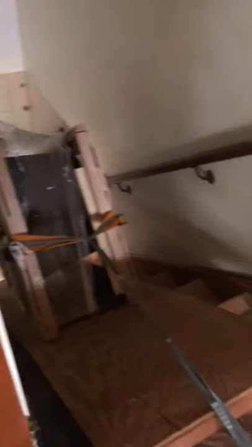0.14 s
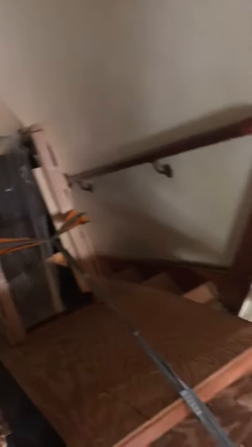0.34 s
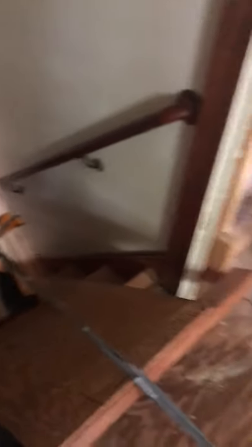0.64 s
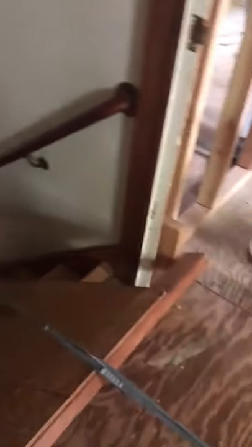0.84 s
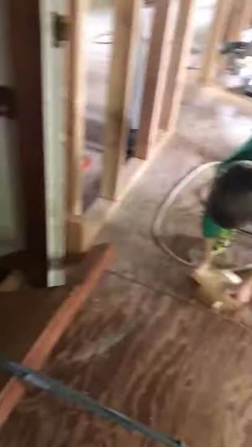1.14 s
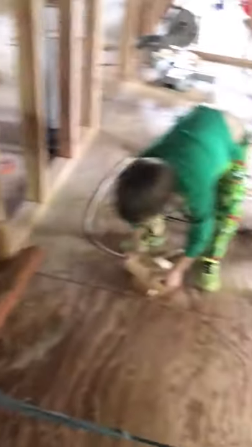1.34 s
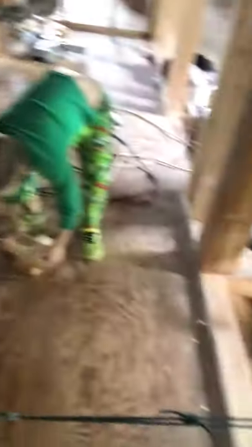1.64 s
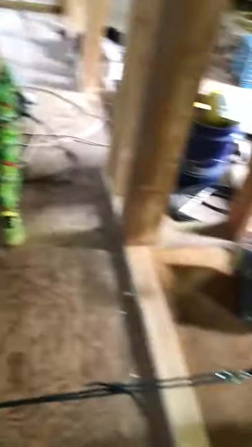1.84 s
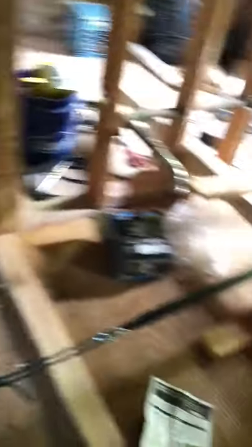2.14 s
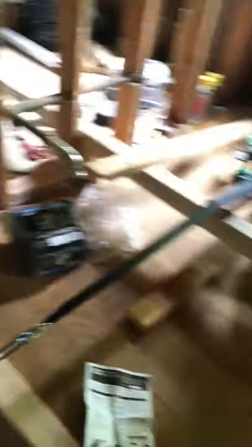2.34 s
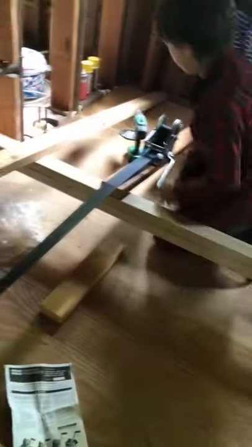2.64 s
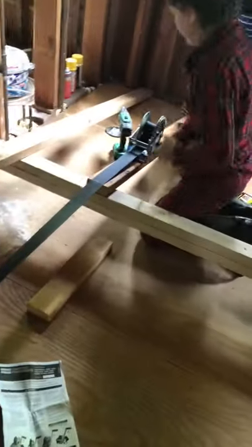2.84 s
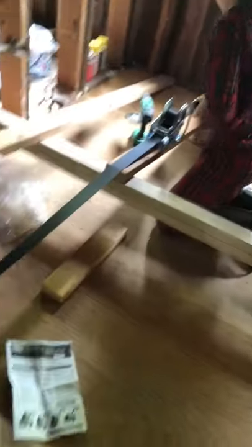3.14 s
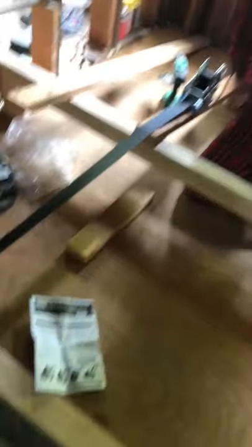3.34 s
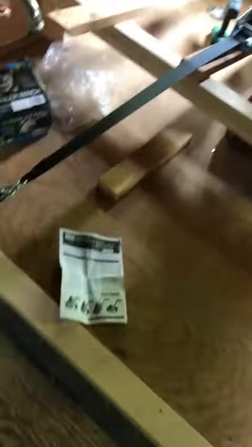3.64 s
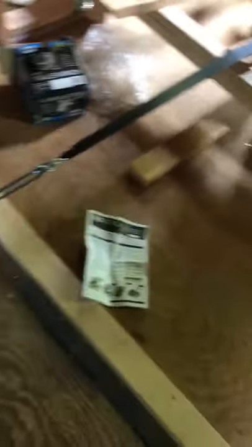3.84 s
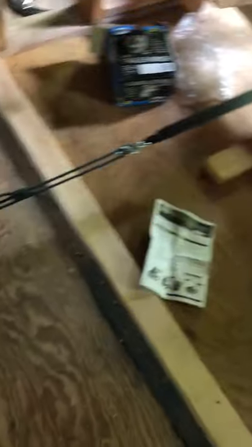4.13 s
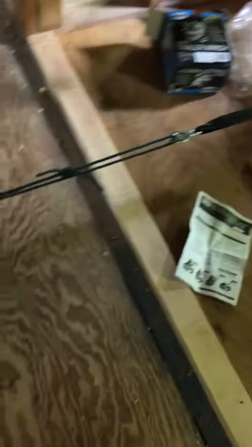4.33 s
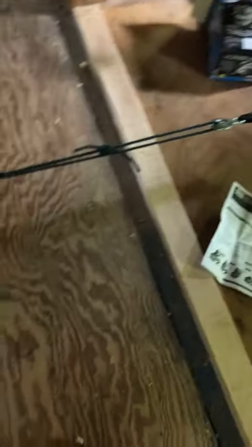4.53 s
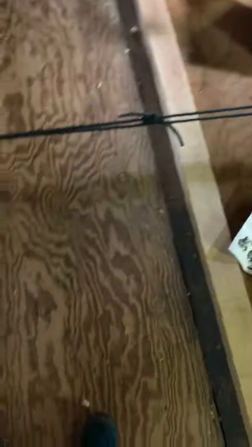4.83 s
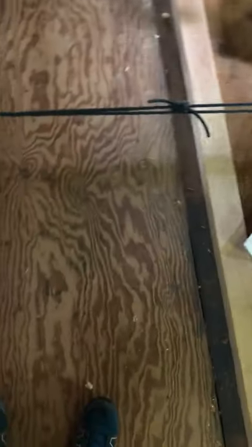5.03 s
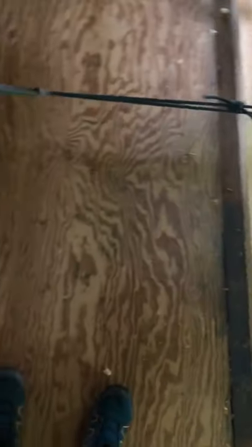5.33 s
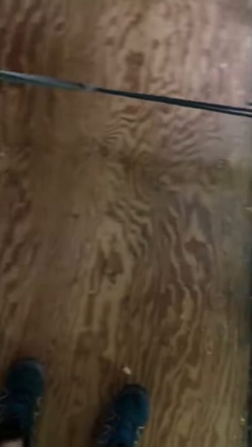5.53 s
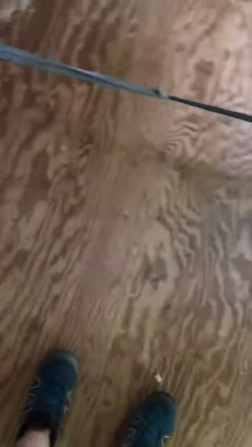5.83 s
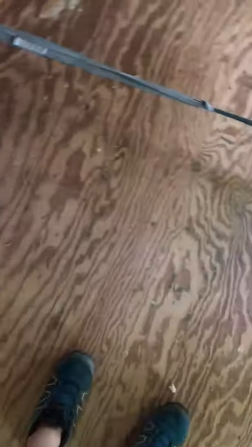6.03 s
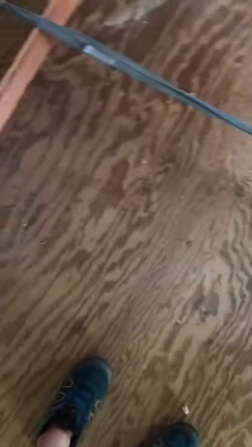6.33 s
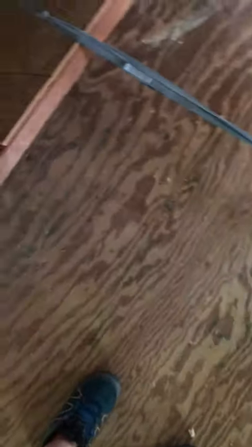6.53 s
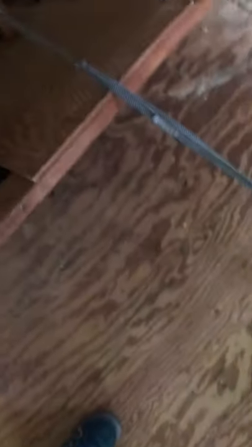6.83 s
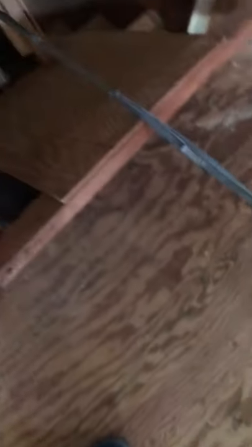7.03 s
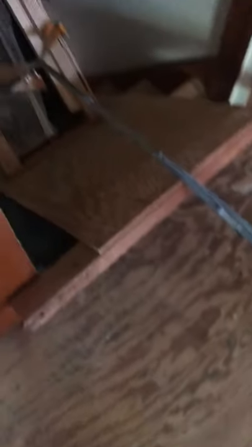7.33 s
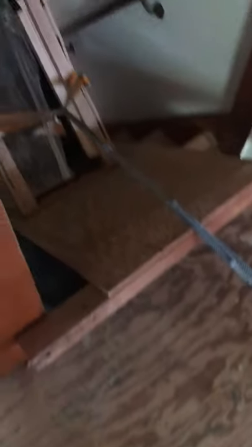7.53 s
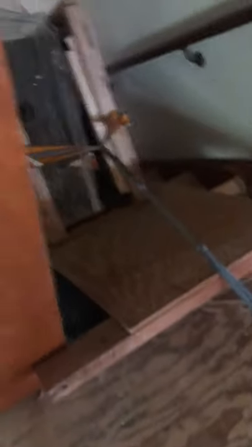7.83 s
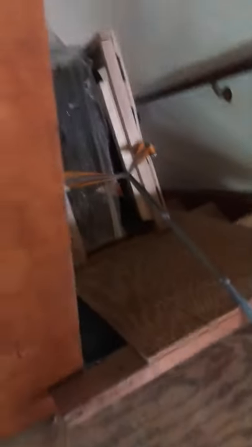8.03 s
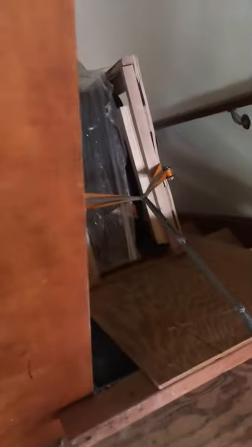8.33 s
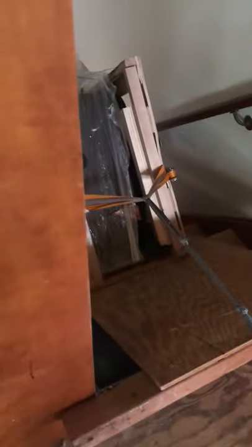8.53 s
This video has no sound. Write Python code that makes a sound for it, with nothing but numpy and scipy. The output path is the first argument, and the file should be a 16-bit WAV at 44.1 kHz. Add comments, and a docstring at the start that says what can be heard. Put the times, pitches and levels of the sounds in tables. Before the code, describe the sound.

Sharp metallic ratchet clicks, irregular and echoing, with strap snaps, a faint strap hiss and a cluster of dull booming wooden knocks near the end.

```python
"""Hand winch on a staircase

A hand winch hauls a heavy crate up a staircase in a bare timber room. Its steel pawl cracks from tooth
to tooth: coloured noise bursts, with damped modes for the ringing wheel and frame. The loaded strap and
frame snap now and then and thump a board; the crate knocks on wooden steps that boom as modes.
Shaped noise makes the still air, the rumbling floor and the faint hiss and squeal of the sliding strap."""
import sys
import numpy as np
from scipy import signal
from scipy.fft import rfft, irfft, next_fast_len
from scipy.io import wavfile

SR = 44100
rng = np.random.default_rng(int(sys.argv[2]) if len(sys.argv) > 2 else 0)


def generate_wav(sig):
    """Save sig (samples, or channels by samples) to the path in sys.argv[1] as 16-bit PCM at SR."""
    pcm = np.round(np.clip(np.atleast_2d(sig).T, -1, 1) * 32767).astype(np.int16)
    wavfile.write(sys.argv[1], SR, pcm)


N = 383229
SINCE_BLOW = np.arange(SR) / SR  # one second of time, in s

# the pawl drops off a tooth: t/s, level/dB of the crack before its trim
PAWL_DROPS = [(-0.085, 1), (0.063, -14), (0.27, -13), (0.409, -13.5), (0.527, -12.5), (0.62, -12),
              (0.731, -13.5), (0.887, -12), (1.014, -9), (1.121, -9), (1.217, -13.5), (1.34, -9),
              (1.568, -9.5), (1.85, -13), (2.264, -8.5), (2.525, -10), (2.68, -10), (2.808, -10.5),
              (2.954, -10), (3.279, -11), (3.546, -10), (3.788, -8.5), (3.941, -6.5), (4.104, -7.5),
              (4.369, -10.5), (5.708, -11), (6.028, -11), (6.326, -10), (6.528, -11.5), (7.413, -11),
              (7.525, -11.5), (7.691, -11), (8.064, -9)]
# the loaded strap and frame snap, and at 1.242 and 1.261 s the pawl bounces with a like short crack and almost
# no thump: t/s, level/dB, level/dB of the board's thump against the snap, before its trims
STRAP_SNAPS = [(0.049, -21.5, 5.5), (0.232, -30.5, -1), (0.417, -20, 3.5), (0.584, -21.5, 3),
               (1.242, -17, -34), (1.261, -20.5, -26), (1.629, -17, -1.5), (3.648, -19.5, 4.5),
               (4.593, -52, -2), (5.288, -46, 10.5), (6.581, -20.5, 2.5), (7.098, -32, 7),
               (7.447, -23.5, 3.5), (8.496, -22, 3), (8.662, -54.5, 26)]
# the crate knocks on the stairs: t/s, level/dB
CRATE_KNOCKS = [(1.051, -28.5), (6.266, -15.5), (6.634, -32.5), (6.763, -13.5), (6.799, -15),
                (6.828, -14.5), (6.840, -14), (7.038, -17), (7.100, -22.5), (7.159, -27.5), (7.346, -37.5),
                (7.632, -37.5), (8.004, -38.5)]
# soft thuds in the floor: t/s, level/dB, f/Hz
FLOOR_THUDS = [(1.06, -37.5, 79.5), (1.151, -45, 75), (5.299, -42.5, 165), (5.34, -50, 65),
               (5.51, -43, 51.7), (5.549, -55, 178)]
# the strap slips along the floor: t/s of the start, length/s, level/dB before its fade
STRAP_SLIPS = [(1.993, 0.23, -56), (5.203, 0.2, -57.5), (5.423, 0.44, -57), (6.225, 0.14, -46.5),
               (6.92, 0.17, -55), (7.312, 0.3, -52.5), (7.91, 0.11, -68), (8.252, 0.3, -50.5)]
# treble of the winch as the microphone turns to it and away: t/s, tilt/dB per octave
MICROPHONE_FACING = [(0, -0.8), (1.0, -0.67), (2.3, 0), (3.0, -0.5), (3.8, 0.44), (4.4, -1.95), (6.0, 0),
                     (7.5, 0.1), (8.1, 0.5)]

# resonant modes of the ratchet wheel and pawl: f/Hz, level/dB, t60/s
WHEEL_MODES = [(1297, -2, 0.037), (1478, -13, 0.056), (2260, -7, 0.037), (3590, -1.5, 0.0067),
               (3797, 0.5, 0.011), (4227, -0.5, 0.0042), (4300, 9.5, 0.0087), (7854, -2, 0.042),
               (7760, -15.5, 0.0072)]
# resonant modes of the drum and frame of the winch: f/Hz, level/dB, t60/s
FRAME_MODES = [(1033, -7.5, 0.032), (1677, -7.5, 0.02), (1915, -3, 0.022), (2800, -5, 0.032),
               (5403, 0, 0.016), (5640, 0, 0.0092), (7370, 1.5, 0.0049), (11160, 6.5, 0.005)]
# resonant modes of the board under the winch: f/Hz, level/dB, t60/s
BOARD_MODES = [(279, -4.5, 0.076), (519, -3, 0.046), (625, -2, 0.039), (723, 4.5, 0.014),
               (1160, 8.5, 0.012), (1320, 14.5, 0.0058), (2230, 7.5, 0.0069)]
# resonant modes of the wooden stairs: f/Hz, level/dB, t60/s
STAIR_MODES = [(100.6, -6, 0.45), (204.7, 5.5, 0.48), (321, 9.5, 0.14), (422, -2, .2), (488, -8.5, .25),
               (695, -14, 0.18), (760, -9.5, 0.1)]
# resonances of the winch under the slipping strap: f/Hz, width/Hz, level/dB
SQUEAL_BANDS = [(2494, 64, 4), (4160, 150, -5.5), (4565, 66, -1), (6040, 130, -8.5)]

# Colours are relative spectra; each sound is scaled to its own level afterwards.
# colour of the pawl's crack: f/Hz, level/dB per Hz
PAWL_CRACK_COLOUR = [(100, -36), (500, -49), (1100, 2), (2200, 4), (3200, 1.5), (4200, 7), (6600, 4.5),
                     (7900, 8), (9500, 4), (11200, 3.5), (15500, -1.5)]
# colour of the winch's clatter and its wash in the room: f/Hz, level/dB per Hz
PAWL_WASH_COLOUR = [(60, -24.5), (150, -13.5), (300, -9.5), (700, -11.5), (1200, -4.5), (2300, -4),
                    (3250, -8.5), (4200, -1), (4900, -8.5), (7900, -5), (9500, -9), (15500, -14)]
# colour of snaps, creaks and contact ticks: f/Hz, level/dB per Hz
SNAP_COLOUR = [(200, -23), (1200, 4.5), (3000, 5), (6000, 4), (11000, 1), (15500, -2)]
# colour of the crate's blow: f/Hz, level/dB per Hz
CRATE_COLOUR = [(50, -35.5), (130, -12.5), (200, 4.5), (330, 4), (500, -3), (780, 0.5), (1000, -9.5),
                (1600, -20.5), (3000, -32.5), (7000, -54.5), (15000, -62)]
# colour of the walls' echoes: f/Hz, level/dB per Hz
ECHO_COLOUR = [(100, -0.5), (16000, -2)]
# colour of the still room air: f/Hz, level/dB per Hz
AIR_COLOUR = [(15, -60.5), (25, -27), (44, -3.5), (145, 5.5), (503, -11.5), (1560, -13), (4140, -22),
              (4490, -22), (14800, -35.5), (16000, -32)]
# colour of the floor's rumble: f/Hz, level/dB per Hz
RUMBLE_COLOUR = [(25, -39), (45, -5.5), (90, 8.5), (170, 13.5), (260, -8), (500, -10.5), (1200, -37.5)]
# colour of the sliding strap: f/Hz, level/dB per Hz
STRAP_COLOUR = [(150, 1.5), (400, 4.5), (900, -6), (2500, -6), (4600, -8), (9000, -14.5), (15500, -24)]
# unevenness of the strap's slide, as slow noise: f/Hz, level/dB per Hz
JUDDER_COLOUR = [(1, -7), (20, -4), (70, -70)]
# decay of the room: f/Hz, t60/s
ROOM_DECAY = [(100, 0.8), (300, 0.45), (700, 0.44), (1500, 0.4), (4000, 0.36), (7000, 0.29), (14000, 0.2)]

USUAL_DB = -7.5  # table level of the reference pawl drop
PAWL_CRACK_DB, SNAP_CRACK_DB = -6, 5  # trims of the direct cracks against their rows
WHEEL_DB, FRAME_DB, CLATTER_DB, WASH_DB = -38.5, -29.5, -28.5, -29.5  # for the reference drop; wheel before speed
BODY_SHARE = 0.25  # dB of ring, clatter and wash for each dB of crack
# a hard drop pins the wheel and rings the frame: dB for each dB of crack, on top of BODY_SHARE
WHEEL_DB_PER_DB, FRAME_DB_PER_DB = -0.32, 0.79
WHEEL_DB_PER_SPEED = 1.0  # the wheel rings more freely when cranked fast: dB per tooth a second
# around a hard knock, tilt follows level: dB per octave for each dB, down to the dullest tilt
HARD_KNOCK_DB, BRIGHT_PER_DB, DULLEST_DB = -15.5, 1.36, -6
# each snap jolts the crate: delay, level against the thump's row, tilt in dB per octave
JOLT_S, JOLT_DB, JOLT_BRIGHT_DB = 0.007, -17, 1
SLIP_RISE_S, SLIP_FADE_DB = 0.051, -11.5  # ramp at both ends of a slip, fade over its length
PULL_S = 0.14  # decay constant of one tooth's pull on the load
RUMBLE_DB, RUMBLE_REST_DB, SLIDE_DB = -52, -70.5, -50  # floor per pull, floor at rest, strap per pull
SHAKE_DB, SHAKE_S = -38.5, 0.3  # floor after a knock: level against the knock, decay constant
JUDDER_DB, SQUEAL_DB = 1.7, -10  # rms swing of the slide, squeal against the strap's hiss
EDGE_HZ = 16000  # upper band limit


def amp(db):
    """Decibels to gain."""
    return 10 ** (np.asarray(db) / 20)


def evened(x):
    """Scales to rms 1."""
    return x / np.sqrt(np.mean(x ** 2) + 1e-20)


def read(points, hz):
    """Reads a table on a log-frequency axis."""
    f, value = np.transpose(points)
    return np.interp(np.log(hz + 1), np.log(f), value)


def tint(colour, hz, tilt_db):
    """Gain of a colour at the frequencies hz, tilted in dB per octave above 200 Hz."""
    octaves = np.log2(np.clip(hz, 200, None))
    return amp(read(colour, hz) + tilt_db * octaves)


def add(mix, s, sound):
    """Mixes a sound in at time s, which may lie before the start."""
    start = round(s * SR)
    sound = sound[max(-start, 0):]
    part = mix[max(start, 0):][:len(sound)]
    part += sound[:len(part)]


def shaped(size, gain):
    """White noise through a spectral gain, evened to rms 1."""
    spectrum = rfft(rng.standard_normal(size))
    return evened(irfft(spectrum * gain, size))


def noise(colour, size, tilt_db=0):
    """Noise of rms 1 with a given colour."""
    return shaped(size, tint(colour, np.fft.rfftfreq(size, 1 / SR), tilt_db))


def steady(colour):
    """Coloured noise of the scene's length."""
    return noise(colour, next_fast_len(N))[:N]


def burst(colour, rise, decay, tilt_db=0):
    """The direct sound of a blow: a brief rough contact, coloured by the body that it strikes."""
    t = SINCE_BLOW[:SR // 3]
    contact = (1 - np.exp(-(t / rise) ** 2)) * np.exp(-t / decay)
    gain = tint(colour, abs(np.fft.fftfreq(len(t), 1 / SR)), tilt_db)
    body = np.exp(np.conj(signal.hilbert(np.log(gain))))  # causal: it rings only after the contact
    rough = contact * rng.standard_normal(len(t))
    sound = np.fft.ifft(np.fft.fft(rough) * body).real
    energy_match = np.linalg.norm(contact / contact.max()) / np.linalg.norm(sound)
    return np.pad(sound, (0, SR - len(t))) * energy_match


def room(colour, build, tilt_db=0, early_db=5, early_at=0.018, early_width=0.025):
    """The room's answer to a blow: echoes thicken, the walls return a clump, the treble dies first."""
    hz, t, z = signal.stft(noise(colour, SR, tilt_db), SR, nperseg=256)
    decay = amp(-60 * t / read(ROOM_DECAY, hz)[:, None])
    tail = signal.istft(z * decay, SR, nperseg=256)[1][:SR]
    walls = amp(early_db * np.exp(-((SINCE_BLOW - early_at) / early_width) ** 2))
    return tail * walls * (1 - np.exp(-SINCE_BLOW / build))


def echoed(sound):
    """The room keeps a short ring alive: convolution with its answer."""
    return signal.fftconvolve(sound, room(ECHO_COLOUR, build=0.00049, early_db=5))[:SR]


def ring(modes, scatter_db, detune, rise):
    """Damped modes of total energy 1, struck with new phases, levels and pitches by every blow."""
    hz, db, t60 = np.transpose(modes)[:, :, None]
    size, shift, phase = rng.standard_normal((3, len(hz), 1))
    t = SINCE_BLOW[:SR // 2]
    fading = amp(db + scatter_db * size - 60 * t / t60)
    waves = fading * np.sin(2 * np.pi * (hz * (1 + detune * shift) * t + phase))
    sound = np.pad(waves.sum(0), (0, SR - len(t))) * (1 - np.exp(-SINCE_BLOW / rise))
    return sound / np.linalg.norm(sound)


def lingering(s, decay, rise=0.008):
    """An envelope that swells at time s and dies away."""
    since = np.maximum(np.arange(N) / SR - s, 0)
    return (1 - np.exp(-since / rise)) * np.exp(-since / decay)


def pulls():
    """Envelope of the load: every tooth pulls on it."""
    return sum(lingering(s, PULL_S) for s, _ in PAWL_DROPS)


def pawl():
    """The pawl slams into the next tooth: a crack, the ring of wheel and frame, and the room."""
    out = np.zeros(N)
    times = np.transpose(PAWL_DROPS)[0]
    speeds = np.gradient(np.arange(len(times)), times)  # teeth a second
    for (s, db), speed in zip(PAWL_DROPS, speeds):
        hard_db = db - USUAL_DB
        tilt_db = np.interp(s, *np.transpose(MICROPHONE_FACING))
        crack = burst(PAWL_CRACK_COLOUR, rise=0.0011, decay=0.0028, tilt_db=tilt_db)
        crack *= amp(db + PAWL_CRACK_DB)
        wheel = ring(WHEEL_MODES, scatter_db=0.0, detune=0.003, rise=0.00031)
        wheel *= amp(WHEEL_DB + WHEEL_DB_PER_SPEED * speed + WHEEL_DB_PER_DB * hard_db)
        frame = ring(FRAME_MODES, scatter_db=1.0, detune=0.0087, rise=0.00028)
        frame *= amp(FRAME_DB + FRAME_DB_PER_DB * hard_db)
        # noise stands for countless small modes, mixed anew by every blow
        clatter = burst(PAWL_WASH_COLOUR, rise=0.00089, decay=0.0043, tilt_db=tilt_db)
        clatter *= amp(CLATTER_DB) / np.linalg.norm(clatter)
        wash = amp(WASH_DB) * room(PAWL_WASH_COLOUR, build=0.026, tilt_db=tilt_db)
        body = echoed(wheel + frame + clatter) + wash
        add(out, s, crack + amp(BODY_SHARE * hard_db) * body)
    return out


def air():
    """Still room air: a steady bed of coloured noise."""
    return amp(-61) * steady(AIR_COLOUR)


def rumble():
    """The floor rumbles low at rest, more under each pull on the load, and shakes after each knock."""
    shake = sum(amp(db) * lingering(s, SHAKE_S) for s, db in CRATE_KNOCKS)
    level = amp(RUMBLE_REST_DB) + amp(RUMBLE_DB) * pulls() + amp(SHAKE_DB) * shake
    return level * steady(RUMBLE_COLOUR)


def squeal():
    """The winch sings under the slipping strap: friction noise in its narrow resonances."""
    size = next_fast_len(N)
    hz = np.fft.rfftfreq(size, 1 / SR)
    gain = sum(amp(db) / (1 + (2 * (hz - centre) / width) ** 2) for centre, width, db in SQUEAL_BANDS)
    return shaped(size, gain)[:N]


def slips():
    """Envelope of the strap's separate slips: each ramps up, fades in level and ramps down."""
    out = np.zeros(N)
    for s, length, db in STRAP_SLIPS:
        t = np.arange(0, length, 1 / SR)
        ramps = np.minimum(np.minimum(t, length - t) / SLIP_RISE_S, 1)
        add(out, s, amp(db + SLIP_FADE_DB * t / length) * ramps)
    return out


def strap():
    """The strap sticks and slides unevenly, hissing and squealing with each pull and slip."""
    judder = amp(JUDDER_DB * steady(JUDDER_COLOUR))
    friction = (steady(STRAP_COLOUR) + amp(SQUEAL_DB) * squeal()) * judder
    return (amp(SLIDE_DB) * pulls() + slips()) * friction


def snaps():
    """A very short crack that thumps the board under the winch; hard snaps fill the room the most."""
    out = np.zeros(N)
    for s, db, board_db in STRAP_SNAPS:
        crack = amp(SNAP_CRACK_DB) * burst(SNAP_COLOUR, rise=0.00016, decay=0.002)
        walls = amp(0.12 * db - 11.0) * room(SNAP_COLOUR, build=0.0099)
        board = ring(BOARD_MODES, scatter_db=-5.5, detune=0.0089, rise=0.00088)
        thump = amp(board_db) * (amp(7.0) * board + amp(-14.0) * echoed(board))
        add(out, s, amp(db) * (crack + walls + thump))
    return out


def knock(bright_db):
    """A dull blow of wood on wood: a tick of contact, the blow, and the hollow stairs booming on."""
    tick = amp(bright_db - 19) * burst(SNAP_COLOUR, rise=0.00051, decay=0.0032, tilt_db=-5.0)
    blow = amp(0.5) * burst(CRATE_COLOUR, rise=0.00018, decay=0.0067, tilt_db=bright_db)
    # against the blow, dull knocks boom the most
    boom = amp(20 - bright_db) * ring(STAIR_MODES, scatter_db=2.0, detune=0.0026, rise=0.0027)
    stairwell = amp(-8) * room(CRATE_COLOUR, build=0.008, tilt_db=bright_db, early_db=-0.5)
    return tick + blow + boom + stairwell


def knocks():
    """The crate bumps on the steps, brighter the harder it lands, and jolts just after every snap."""
    out = np.zeros(N)
    for s, db in CRATE_KNOCKS:
        bright_db = max(BRIGHT_PER_DB * (db - HARD_KNOCK_DB), DULLEST_DB)
        add(out, s, amp(db) * knock(bright_db))
    for s, db, board_db in STRAP_SNAPS:
        add(out, s + JOLT_S, amp(db + board_db + JOLT_DB) * knock(JOLT_BRIGHT_DB))
    return out


def creaks(per_second=7, level_db=-55):
    """Faint dry ticks of the stretched strap, at random moments and up to the given level."""
    out = np.zeros(N)
    seconds = N / SR
    for when, size in rng.random((int(per_second * seconds), 2)):
        tick = burst(SNAP_COLOUR, rise=0.0006, decay=0.002, tilt_db=-0.5)
        answer = amp(-11.5) * room(SNAP_COLOUR, build=0.005, tilt_db=-3.0)
        add(out, when * seconds, amp(level_db) * size ** 2 * (tick + answer))
    return out


def thuds():
    """Weight shifts on the plywood floor: soft bursts of noise coloured around a low pitch."""
    out = np.zeros(N)
    for s, db, hz in FLOOR_THUDS:
        colour = [(hz / 3, -30), (hz, 0), (hz * 2, -16), (hz * 12, -70)]  # f/Hz, level/dB per Hz
        add(out, s, amp(db) * burst(colour, rise=0.007, decay=0.08))
    return out


def scene():
    """All sources reach one microphone, heard alike on both channels."""
    mono = pawl() + air() + rumble() + strap() + snaps() + knocks() + creaks() + thuds()
    return np.array([mono, mono])


def record(dry, low_cut_hz=39):
    """The deepest bass is shed and the loudest peaks are held under a gentle ceiling; then the band limit."""
    thinned = signal.sosfilt(signal.butter(3, low_cut_hz, "highpass", fs=SR, output="sos"), dry)
    rounded = 0.6 * np.tanh(thinned / 0.6)
    band_limit = signal.firwin(301, EDGE_HZ, window=("kaiser", 9), fs=SR)
    return signal.oaconvolve(rounded, band_limit[None], "same")


dry = scene()
out = record(dry)
generate_wav(out)
```